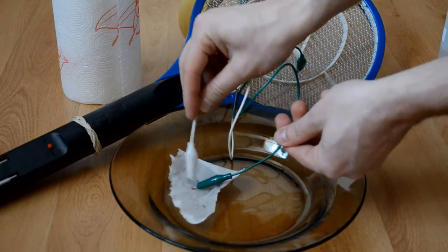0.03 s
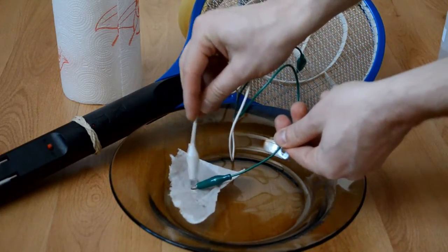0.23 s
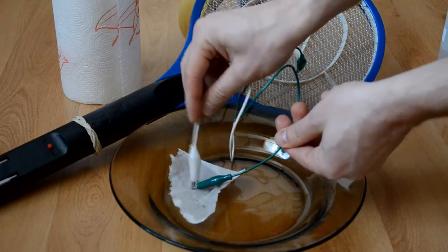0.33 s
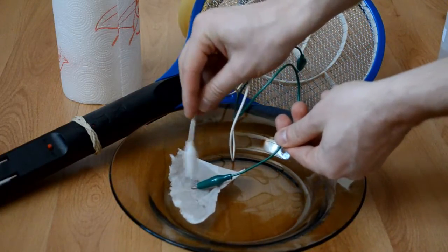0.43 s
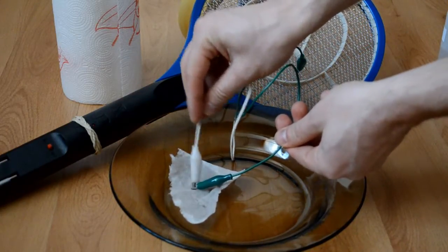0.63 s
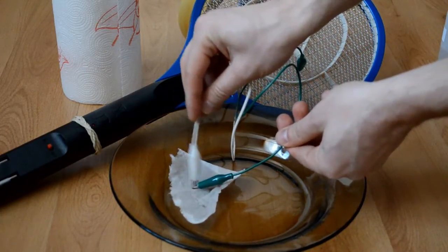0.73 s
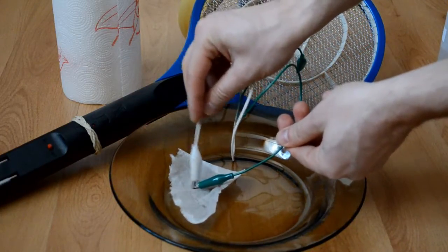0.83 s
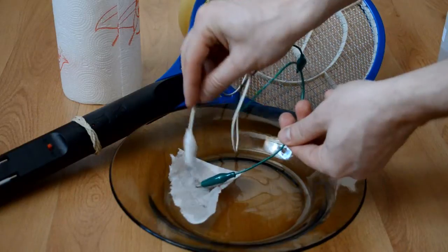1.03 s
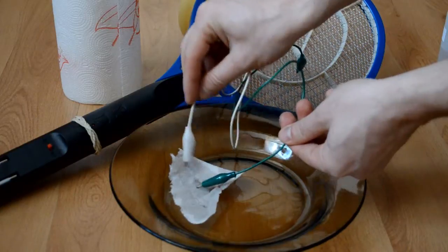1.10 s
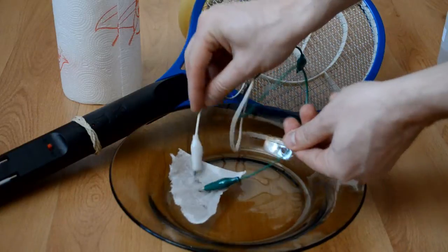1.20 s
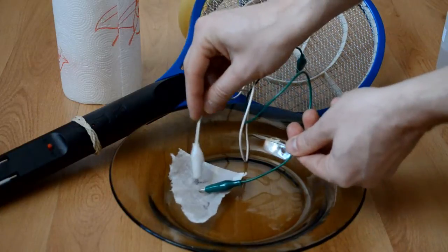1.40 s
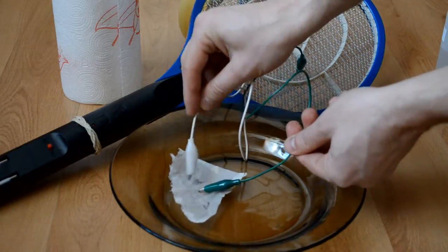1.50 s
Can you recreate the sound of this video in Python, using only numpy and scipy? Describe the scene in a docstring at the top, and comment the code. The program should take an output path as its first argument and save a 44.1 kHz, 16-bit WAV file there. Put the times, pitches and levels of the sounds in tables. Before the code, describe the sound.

Seven sharp electric sparks snap unevenly over a glass dish in a small room.

```python
"""Sparks over a glass dish

Seven sparks from a charged fly swatter jump between two wire leads held over a glass dish on a table.
Each is one sharp push of air that rings briefly in the hollow of the dish; nearby surfaces and a small
room answer. The leads scrape faintly as they are drawn apart. Behind it all are a steady appliance hum,
soft room noise and a thin electrical whine."""
import sys
import numpy as np
from scipy import signal
from scipy.fft import rfft, irfft
from scipy.io import wavfile

SR = 44100
rng = np.random.default_rng(int(sys.argv[2]) if len(sys.argv) > 2 else 0)


def materialize(psi):
    """Save the field psi as 16-bit PCM at rate SR to the path in sys.argv[1].

    A 1-D psi becomes a single channel; in a 2-D psi each row is a channel.
    """
    bounded = np.clip(np.atleast_2d(psi).T, -1, 1)
    quanta = np.round(bounded * 32767).astype(np.int16)
    wavfile.write(sys.argv[1], SR, quanta)


N = 68355


def amp(db):
    """Turns decibels into a number to multiply by."""
    return 10 ** (np.asarray(db) / 20)


def evened(x):
    """Scales a signal so that its average power is one."""
    return x / np.sqrt(np.mean(abs(x) ** 2) + 1e-20)


def read(points, hz):
    """Reads between the rows of a table, with octaves evenly spaced."""
    row_hz, value = np.transpose(points)
    return np.interp(np.log(hz + 1), np.log(row_hz + 1), value)


def add(mix, start_s, sound):
    """Mixes a sound in at a given time."""
    part = mix[max(round(start_s * SR), 0):][:len(sound)]
    part += sound[:len(part)]


def pulse(points, peaks=(), size=2048):
    """The most sudden click that has a given tone colour and ringing peaks."""
    hz = abs(np.fft.fftfreq(size, 1 / SR))
    peaks_db = sum(lift * .5 ** ((2 * (hz - centre) / width) ** 2) for centre, width, lift in peaks)
    log_gain = np.log(amp(read(points, hz) + peaks_db))
    spectrum = np.exp(np.conj(signal.hilbert(log_gain)))  # packs the energy at the start
    return np.fft.ifft(spectrum).real


def grains(fade_s, per_s, size=2048):
    """A short cluster of tiny random clicks that dies away."""
    clicks = rng.standard_normal(size) * (rng.random(size) < per_s / SR)
    fade = np.exp(-np.arange(size) / SR / fade_s)
    return evened(clicks * fade) / np.sqrt(size)


def room_noise():
    """The soft, low rush of the room."""
    # Each row: frequency in Hz, relative level in dB.
    colour = [(25, -9.5), (70, -7), (120, 0.5), (175, 7.5), (225, 3), (310, 2.5), (420, 2), (700, 2),
              (1300, 0.5), (2000, -4), (2800, -11), (3600, -16.5), (5000, -24.5), (8000, -29.5),
              (15000, -35)]
    gain = amp(read(colour, np.fft.rfftfreq(N, 1 / SR)))
    noise = irfft(rfft(rng.standard_normal(N)) * gain, N)
    return amp(-57.5) * evened(noise)


def appliance_hum(waver_hz=19):
    """An appliance's hum and a thin electrical whine: held tones that waver at random."""
    # Each row: pitch in Hz, level in dB, wavering as a share of the level.
    tones = [(186.5, -70.5, 1.3), (261.3, -61, 0.47), (558, -67, 0.66), (712, -74.5, 0.594),
             (2820, -77, 2.2), (15600, -77.5, .05)]
    t, out = np.arange(N) / SR, np.zeros(N)
    keep_slow = np.exp(-.5 * (np.fft.fftfreq(N, 1 / SR) / waver_hz) ** 2)
    for hz, db, unsteady in tones:
        waver = evened(np.fft.ifft(keep_slow * np.exp(2j * np.pi * rng.random(N))))
        tone = np.exp(2j * np.pi * (hz * t + rng.random()))
        out += amp(db) * evened(((1 + unsteady * waver) * tone).real)
    return out


def room_tail(size=256, rise_s=.0066):
    """The room's many echoes blur together, swell quickly and die sooner in the treble."""
    # The tail's tone. Each row: frequency in Hz, level in dB.
    colour = [(40, -21.5), (200, -8.5), (550, -11), (1050, 3), (1450, 0.5), (1900, 4.5), (2700, 2),
              (3100, -6), (3600, -1), (5500, -6.5), (8200, -3), (9600, -5.5), (11200, -1), (12600, 1.5),
              (14200, -6), (15600, -15)]
    # Each row: frequency in Hz, seconds the room takes to fade by 60 dB.
    fade_times = [(200, 0.44), (2000, 0.33), (5000, 0.32), (9000, 0.27), (13000, 0.2), (15500, .19)]
    count = SR * 2 // 3
    noise = evened(irfft(np.exp(2j * np.pi * rng.random(count // 2 + 1))))
    hz, t, bands = signal.stft(noise, SR, nperseg=size)
    rate = np.log(1000) / read(fade_times, hz)[:, None]
    fading = bands * np.sqrt(2 * rate / SR) * np.exp(-rate * t)  # same energy in each band
    tail = signal.istft(fading, SR, nperseg=size)[1]
    tail *= 1 - .5 * np.exp(-np.arange(len(tail)) / SR / rise_s)
    return signal.fftconvolve(tail, pulse(colour))


def snap_in_room(scatter_fade_s=.0012):
    """One snap rings in the dish and echoes; the gap stays put, so all sparks share this sound."""
    # The snap as it arrives directly. Each row: frequency in Hz, level in dB.
    snap = [(30, -16), (110, -8.5), (220, -1.5), (600, -1), (1400, -3), (1800, -20.5), (2100, -4),
            (3050, -6), (3500, 0), (4400, -6.5), (5200, 3), (6100, 1.5), (7300, -14), (8200, 4), (9500, 2),
            (10900, 5.5), (12600, 4), (13100, -8.5), (13700, -17), (14300, 4.5), (15400, -7.5),
            (16500, -16)]
    # Air ringing in the dish. Each row: pitch in Hz, width in Hz, boost in dB.
    dish = [(1124, 320, 5), (1518, 265, 12.5), (2610, 450, 16.5)]
    # Echoes from nearby surfaces. Each row: delay in seconds, level in dB.
    echoes = [(.0049, -17), (.0102, -13.5), (.0119, -21), (.0147, -16), (.0169, -17.5)]
    # Small surfaces throw back mostly treble. Each row: frequency in Hz, level in dB.
    echo_colour = [(200, -11.5), (1200, 0), (2700, -0.5), (4000, 0), (10500, 1.5), (12700, -1.5),
                   (14200, -8.5), (16000, -9)]
    echo, out = -pulse(echo_colour), np.zeros(SR)
    add(out, 0, -pulse(snap, dish))
    scatter = signal.fftconvolve(echo, grains(scatter_fade_s, per_s=SR))  # off the hands and the rim
    add(out, scatter_fade_s / 2, amp(-6.5) * scatter)
    for delay_s, db in echoes:
        add(out, delay_s, amp(db) * echo)
    add(out, start_s=.002, sound=room_tail())
    return out


def lead_scrapes():
    """The wire leads scrape faintly as they are drawn apart."""
    # Each row: start in seconds, relative level in dB.
    scrapes = [(1.244, -50.5), (1.2605, -44), (1.335, -55)]
    out = np.zeros(N)
    for start_s, db in scrapes:
        add(out, start_s, amp(db) * grains(fade_s=.0093, per_s=4000))
    return out


def sparks(bass_hz=1400, middle_hz=2545, treble_hz=5000):
    """Each spark gives the air one sharp push, with its own strength and tone."""
    # Each row: start in seconds, relative level in dB, extra bass in dB, extra treble in dB.
    jumps = [(.2141, 0, 1, -1), (0.4081, -10, -1.5, 1), (0.5846, -10, -3.5, -2), (0.6363, -14.5, -1, 0),
             (0.7413, -8, -1, 1.5), (0.8944, -13.5, -3, 0), (1.0482, -18, -1, -1)]
    out = np.zeros(N)
    for start_s, db, bass_db, treble_db in jumps:
        colour = [(bass_hz, bass_db), (middle_hz, 0), (treble_hz, treble_db)]
        add(out, start_s, amp(db) * pulse(colour))
    return out


def scene():
    """Sparks and scrapes take on the sound of the snap, over the quiet room, in mono."""
    snaps = signal.fftconvolve(sparks() + lead_scrapes(), snap_in_room())[:N]
    return (snaps + room_noise() + appliance_hum())[None]


def record(dry, cutoff_hz=16100):
    """Cuts away the very highest treble."""
    low_pass = signal.firwin(255, cutoff_hz, window=("kaiser", 8), fs=SR)
    return signal.oaconvolve(dry, low_pass[None], "same")


dry = scene()
out = record(dry)
materialize(out)
```